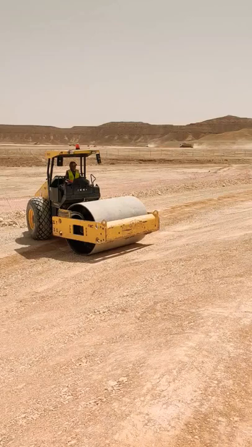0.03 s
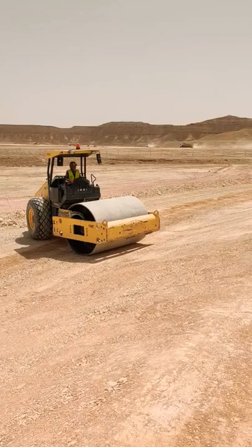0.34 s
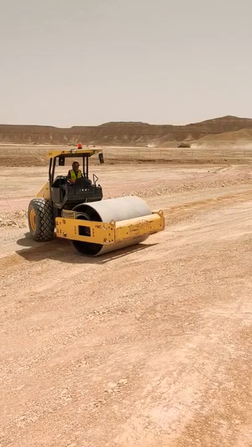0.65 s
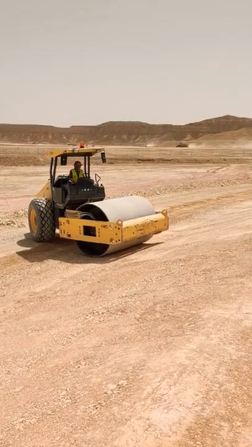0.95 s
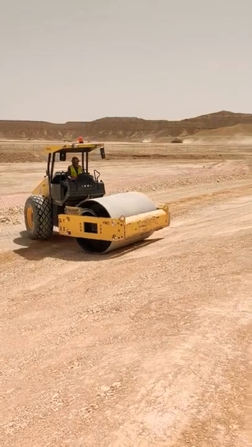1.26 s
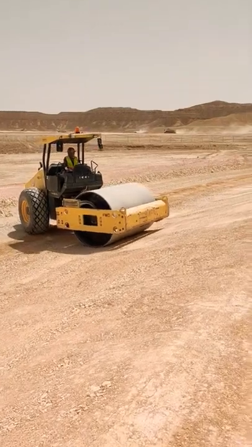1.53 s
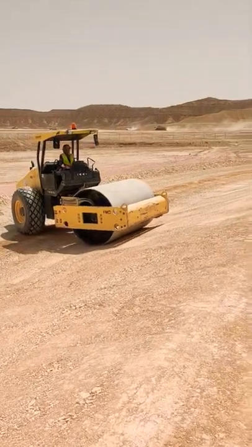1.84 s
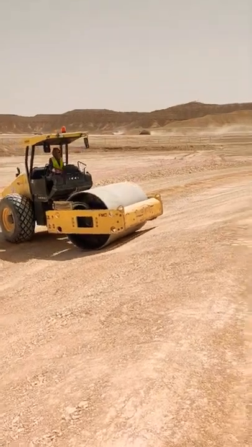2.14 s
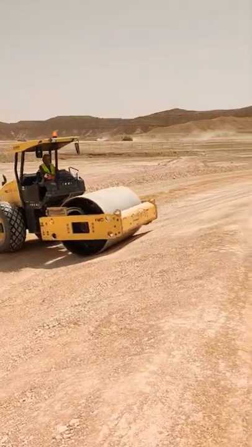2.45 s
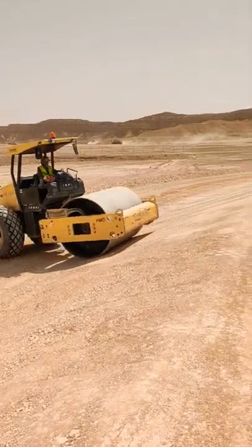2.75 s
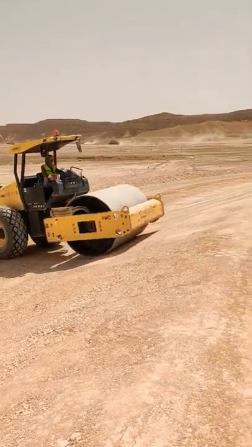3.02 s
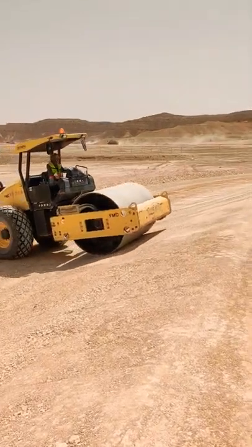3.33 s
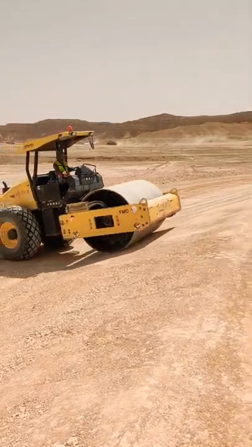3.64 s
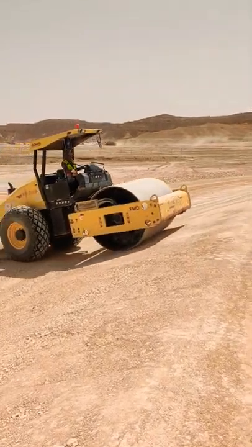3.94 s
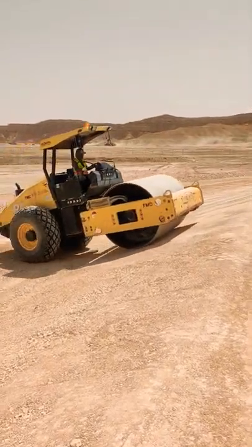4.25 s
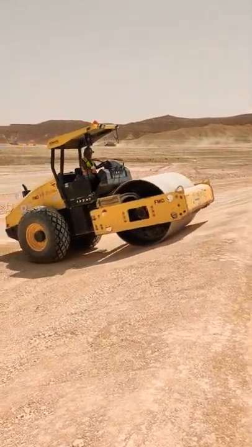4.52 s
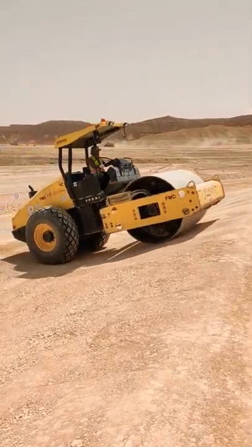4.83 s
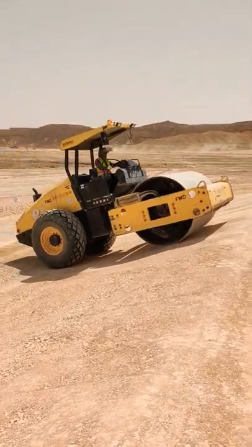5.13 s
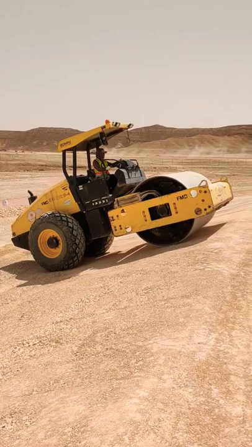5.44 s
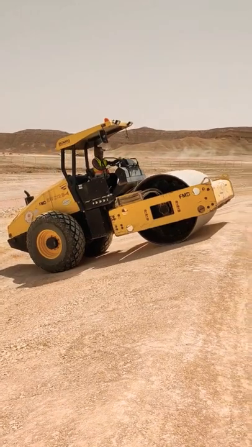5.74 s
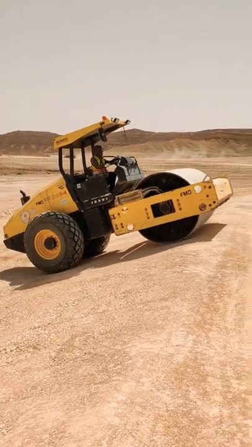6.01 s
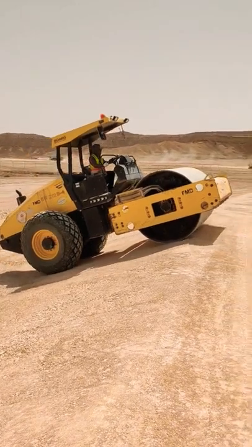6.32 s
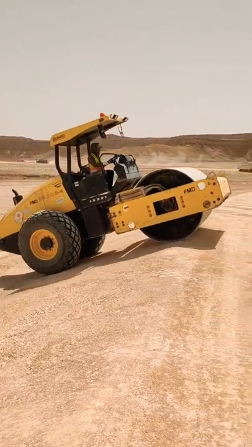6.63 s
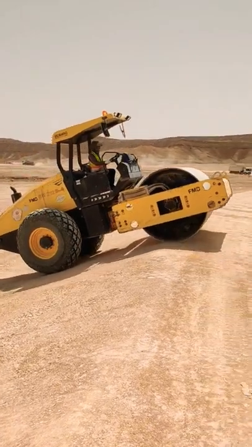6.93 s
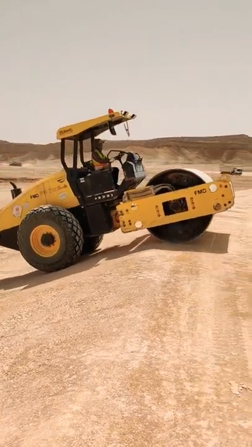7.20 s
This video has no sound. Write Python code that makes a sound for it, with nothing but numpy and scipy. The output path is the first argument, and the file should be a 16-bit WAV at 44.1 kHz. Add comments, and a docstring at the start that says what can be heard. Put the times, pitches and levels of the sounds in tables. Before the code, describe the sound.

A very brief muffled burst ends in a click, followed by a short silence. At about 0.5 seconds a road roller cuts in outdoors, its diesel engine running at steady speed with a wavering hydraulic whine above it. Stones squeak briefly under the steel drum in the first second and a half, and others break with dull clanks until about 5 seconds, the loudest near 2.4. Around 3 seconds the drum's vibration spins up, shaking the frame into a rattle, then building into a deep, fast pounding. From about 5.5 seconds the drum bounces and the throb becomes rougher. The machine grows gradually louder and is closest at around 6 seconds, still running at the end, just past 7. Faint gravel hiss and gritty steel ringing accompany it. Underneath is a low ground rumble, with gusts and occasional dull wind thumps on the microphone.

```python
"""A muffled burst and a click, then a vibratory road roller is heard working loose desert ground.
One microphone in the open air; the machine creeps past it, about 5.5 m away at the closest.
Its four-cylinder diesel holds near 2200 rpm and a nine-piston hydraulic pump whines over the exhaust.
Stones squeak and break under the steel drum. The eccentric weight inside spins up, and the drum pounds
the gravel and finally bounces on every second turn. The ground rumbles; gusts buffet the microphone."""
import sys
import numpy as np
from scipy import signal
from scipy.fft import rfft, irfft, next_fast_len
from scipy.io import wavfile

SR = 44100
rng = np.random.default_rng(int(sys.argv[2]) if len(sys.argv) > 2 else 0)


def bounce(signal):
    """Save signal as a 16-bit WAV file at the path given by the first command-line argument."""
    frames = np.transpose(np.atleast_2d(signal))
    limited = np.clip(frames, -1, 1)
    pcm = np.round(limited * 32767).astype(np.int16)
    wavfile.write(sys.argv[1], SR, pcm)


N = 320607
TIME = np.arange(N) / SR

# Governed speed of the crankshaft: time_s, turns_per_s
CRANK_SPEED = [(0.55, 37.8), (1.2, 37.42), (1.8, 37.08), (2.08, 37.08), (2.33, 36.88), (2.95, 36.6),
               (3.2, 36.74), (4.2, 36.78), (5.08, 37.0), (5.33, 36.86), (5.7, 36.86), (5.95, 37.1),
               (6.2, 36.82), (6.45, 36.8), (7.2, 37.28)]
# The engine sags under load and recovers: centre_s, width_s, lost_turns_per_s
LOAD_SAGS = [(1.55, 0.11, 0.5), (3.56, 0.15, 0.9)]
# Engine tones at the closest point: crank_multiple, level_db, distance_share, waver_db
ENGINE_ORDERS = [(3, -48.5, 1.1, -0.5), (5, -53, 0.59, 4), (6, -34.5, 1.8, -0.5), (7, -34, 2.2, 3),
                 (10, -48.5, 0.96, 4), (16, -51.5, 0.44, 4.5), (21, -49, 0.3, 0.5)]
# The firing tone booms when the engine pulls: centre_s, width_s, rise_db
FIRING_BOOMS = [(1.56, 0.11, 7), (1.85, 0.15, 4), (2.7, 0.5, 5), (3.62, 0.14, 7.5), (4.58, 0.18, 10),
                (5.55, 0.33, 8.5), (6.35, 0.44, 6), (7.15, 0.2, 9)]
# The hum an octave above the firing tone swells: centre_s, width_s, rise_db
OCTAVE_SWELLS = [(4.55, 0.18, 3.5), (6.7, 0.69, 3)]
# Noise spectra of exhaust gas, engine block, valves and ground: frequency_hz, density_db
EXHAUST_SPECTRUM = [(60, -14.5), (110, -1), (160, -0.5), (230, -1.5), (320, -0.5), (375, -4), (430, -10.5),
                    (500, -17), (700, -42.5), (1200, -47.5)]
BLOCK_SPECTRUM = [(350, -15.5), (500, -7), (620, -1), (780, 3), (920, 0.5), (1060, -5), (1250, -3.5),
                  (1550, -10), (1950, -7.5), (2300, -12), (3000, -37)]
VALVE_SPECTRUM = [(1500, -26.5), (2200, 0.5), (2700, 1), (3300, -0.5), (4000, -4.5), (5500, -22)]
GROUND_SPECTRUM = [(7, -3), (25, -0.5), (45, -7), (70, -5.5), (100, -15), (140, -17.5), (250, -46.5)]

# The pump's piston tone at the microphone: time_s, level_db
PISTON_LEVEL = [(0.6, -38), (1.65, -34), (1.95, -38.5), (2.3, -38.5), (3.25, -33.5), (3.5, -49),
                (3.95, -38.5), (4.25, -28.5), (4.85, -28), (5.7, -25.5), (6.25, -32), (6.55, -37),
                (6.8, -33.5), (7.25, -44)]
# Pump overtones between surges, at the closest point: harmonic, level_db, distance_share
PUMP_HARMONICS = [(2, -44.5, 1.1), (3, -64.5, 3), (4, -53, 1.4), (6, -51.5, 1.5), (7, -57, 3.1),
                  (8, -57.5, 2.1), (9, -63.5, 1.9), (10, -67, 1.6), (11, -63.5, 2), (13, -70, 2),
                  (14, -74, 1.8)]
# Oil pressure surges and one harmonic sings out: start_s, end_s, harmonic, level_db
PRESSURE_SURGES = [(0.443, 0.65, 2, -41.5), (1.417, 1.475, 2, -32.5), (2.225, 3.07, 2, -38.5),
                   (5.227, 5.851, 2, -33), (5.885, 6.4, 2, -41), (6.467, 6.921, 2, -36),
                   (6.954, 7.17, 2, -33.5), (2.355, 2.98, 4, -50), (6.22, 7.3, 4, -48.5),
                   (1.42, 1.795, 6, -53), (2.237, 2.834, 6, -47.5), (3.34, 3.427, 6, -42.5),
                   (3.485, 3.587, 6, -43.5), (3.656, 3.78, 6, -48.5), (4.46, 5.25, 6, -50.5),
                   (5.282, 5.737, 6, -41.5), (6.048, 6.202, 6, -44.5), (6.207, 6.493, 6, -40.5),
                   (6.686, 6.97, 6, -45), (7.14, 7.298, 6, -48), (2.352, 3.05, 7, -58),
                   (3.502, 3.73, 7, -51), (4.25, 4.417, 7, -49), (4.72, 5.147, 7, -49),
                   (6.12, 6.45, 7, -49), (3.374, 3.6, 8, -56), (5.5, 5.85, 8, -52), (5.82, 6.0, 9, -55),
                   (6.03, 6.45, 9, -58), (6.53, 6.67, 9, -51), (6.88, 7.24, 9, -55.5)]
# Gusts and lulls of wind on the microphone: centre_s, width_s, rise_db
WIND_GUSTS = [(0.8, 0.18, 3.5), (1.1, 0.026, 2.5), (2.23, 0.069, 6.5), (3.25, 0.54, 2), (4.28, 0.065, 7),
              (6.1, 0.53, -0.5)]
# Dull thumps of wind on the microphone: centre_s, width_s, level_db
WIND_THUMPS = [(0.813, 0.004, -14), (3.019, 0.003, -15), (3.276, 0.003, -10.5), (3.61, 0.003, -11.5),
               (3.745, 0.003, -13), (4.279, 0.004, -8), (4.628, 0.003, -14)]

# Hiss of gravel ground under the drum: time_s, level_db
GRAVEL_LEVEL = [(0.5, -57), (0.85, -58.5), (1.25, -59.5), (2.1, -59), (2.95, -54), (3.9, -53.5),
                (4.65, -54.5), (5.1, -53), (5.9, -52.5), (6.45, -52), (7.25, -52)]
# Spectrum of that hiss: frequency_hz, density_db
GRAVEL_SPECTRUM = [(2500, -22.5), (3800, -2.5), (4500, 3), (5500, 2), (6500, -0.5), (7500, -6),
                   (9000, -16.5)]
# Ringing modes of the drum's steel shell: pitch_hz, relative_db
SHELL_MODES = [(1222, 13.5), (2768, 5), (3402, 1.5), (3900, -1.5), (4215, -0.5), (4387, -1), (4572, 0),
               (5001, -2), (5303, -3), (5905, -9), (6510, -10), (6788, -7.5), (7305, -5.5)]
# Grit rubs the shell in spells: centre_s, width_s, rise_db
GRIT_RUBS = [(0.9, 0.16, 8), (3.05, 0.63, 10.5), (4.6, 0.49, 12.5), (6.4, 0.19, 10)]
# Stick-slip of steel on stone: centre_s, width_s, pitch_hz, level_db, glide_hz_per_s
STONE_SQUEAKS = [(0.482, 0.01, 770, -35, 2000), (0.535, 0.012, 790, -37, 2000), (0.80, 0.025, 780, -39, 0),
                 (0.872, 0.018, 778, -31, 0), (0.81, 0.03, 1780, -51, 0), (0.98, 0.015, 1775, -46, 0),
                 (0.95, 0.02, 780, -38, 0), (1.025, 0.03, 782, -35, 0), (1.412, 0.016, 760, -30, -1300),
                 (2.415, 0.02, 778, -37, 0), (2.91, 0.05, 4387, -54, 0), (2.97, 0.04, 2767, -53, 0),
                 (3.33, 0.03, 4575, -57, 0), (3.56, 0.03, 4387, -56, 0), (4.5, 0.05, 4387, -58, 0),
                 (4.61, 0.06, 4572, -57, 0), (4.81, 0.035, 2772, -50, 0), (4.82, 0.04, 5782, -59, -300)]
# Stones breaking under the drum: start_s, decay_s, level_db, frame_pitch_ratio
STONE_BREAKS = [(0.467, 0.05, -33, 1), (1.378, 0.045, -30, 0.975), (2.378, 0.055, -24.5, 1),
                (2.52, 0.06, -32, 1), (3.09, 0.07, -34, 1), (3.24, 0.05, -34, 1), (4.02, 0.04, -33, 1),
                (4.16, 0.05, -32, 1), (4.53, 0.06, -33, 1), (4.78, 0.05, -34, 1)]
# Modes of the frame that they shake: pitch_hz, width_hz, relative_db
FRAME_MODES = [(665, 45, -11), (775, 45, -1), (942, 55, -1), (1230, 110, -2), (2030, 180, -2.5),
               (2720, 120, -12)]
# Overall colour of the frame's ring: frequency_hz, gain_db
FRAME_SPECTRUM = [(300, -5.5), (700, 8), (2000, -5.5), (4000, -13.5), (7000, -33)]

# The eccentric weight spins up: time_s, turns_per_s
WEIGHT_SPEED = [(2.2, 11.5), (2.85, 16.6), (3.25, 19.8), (4.0, 24.27), (4.5, 26.1), (5.0, 26.85),
                (5.5, 27.3), (6.0, 27.7), (6.5, 27.87), (7.27, 28.15)]
# Drum tones at full spin: weight_multiple, grounded_db, bouncing_db
POUNDING_TONES = [(1, -19, -21.5), (1.5, -44, -20.5), (2, -21, -38.5), (3, -23.5, -26), (3.5, -55, -31),
                  (4, -37, -44.5), (4.5, -55, -46.5), (5, -40, -42.5), (6, -43, -36.5)]
# Hum of the motor that drives the weight, at full spin: weight_multiple, level_db
MOTOR_HUM = [(14.5, -44), (16.5, -46.5), (27, -54)]


def from_db(db):
    """Decibels to gain."""
    return 10 ** (np.asarray(db) / 20)


def rms_one(x):
    """Scale to unit power."""
    return x / np.sqrt(np.mean(x ** 2) + 1e-20)


def curve(rows):
    """Join points of (time_s, value) with straight lines."""
    return np.interp(TIME, *np.transpose(rows))


def swell(centre_s, width_s):
    """A bell-shaped rise and fall of height 1."""
    return np.exp(-.5 * np.minimum(((TIME - centre_s) / width_s) ** 2, 100))


def swells(rows):
    """Sum the swells in a table of (centre_s, width_s, height)."""
    return sum(height * swell(centre_s, width_s) for centre_s, width_s, height in rows)


def step(at_s, edge_s):
    """A smooth rise from 0 to 1."""
    return .5 + .5 * np.tanh((TIME - at_s) / (2 * edge_s))


def drift(rate_hz):
    """A slow random wander of spread 1 that changes about rate_hz times a second."""
    hop, run_in = 40, 2000
    pole = np.exp(-2 * np.pi * rate_hz * hop / SR)
    noise = rng.standard_normal(N // hop + run_in + 2)
    slow = signal.lfilter([1], [1, -2 * pole, pole * pole], noise)[run_in:]
    return np.interp(np.arange(N) / hop, np.arange(len(slow)), rms_one(slow))


def coloured(x, spectrum):
    """Give an excitation a spectrum that falls away beyond its ends; unit power."""
    size = next_fast_len(N)
    hz, db = np.transpose(spectrum)
    bin_hz = np.maximum(np.arange(size // 2 + 1) * SR / size, 1)
    skirts = np.minimum(bin_hz / hz[0], 1) ** 2 * np.minimum(hz[-1] / bin_hz, 1) ** 2
    gain = from_db(np.interp(np.log(bin_hz), np.log(hz), db))
    return rms_one(irfft(rfft(x, size) * skirts * gain, size)[:N])


def resonance(x, hz, width_hz):
    """A two-pole resonance; unit power."""
    r = np.exp(-np.pi * width_hz / SR)
    return rms_one(signal.lfilter([1, 0, -1], [1, -2 * r * np.cos(2 * np.pi * hz / SR), r * r], x))


def tone(turns, multiple, db, waver_db):
    """One harmonic or half harmonic of a rotating part, wavering in strength."""
    angle = 2 * np.pi * (multiple * turns + rng.random())
    return np.sqrt(2) * from_db(db + waver_db * drift(5.7)) * np.sin(angle)


def pulsed_noise(cycles, fall_db):
    """Noise that slides down by fall_db through each cycle (up, if negative) and jumps back."""
    return rng.standard_normal(N) * from_db(-fall_db * (cycles % 1))


def drive_past(closest_s, closest_m, speed_m_per_s):
    """Level at the microphone in dB against the closest point, for a straight pass."""
    return -20 * np.log10(np.hypot(1, speed_m_per_s * (TIME - closest_s) / closest_m))


def at_microphone(close_db, distance_db, share, waver_db):
    """Wavering gain of a noise layer; share scales how much it loses with distance."""
    return from_db(close_db + share * distance_db + waver_db * drift(4.2))


def opening_burst(dry, start_s, click_s):
    """The sound swells in briefly, muffled and with a faint hiss, and breaks off with a 2 ms click."""
    opening = np.clip((TIME - start_s) / (click_s - start_s), 0, 1) ** .5 * (TIME < click_s)
    muffled = signal.sosfilt(signal.butter(1, 500, fs=SR, output="sos"), dry * opening)
    hiss = from_db(-55.5) * rng.standard_normal(N)
    burst = from_db(-16) * muffled + (opening > 0) * (0.22 * dry + hiss)
    snap = ((TIME >= click_s) & (TIME < click_s + 0.002)) * (rng.standard_normal(N) - 0.8)
    click = from_db(-21.5) * signal.sosfilt(signal.butter(1, 3500, fs=SR, output="sos"), snap)
    return burst + click


def diesel(turns, distance_db):
    """Two firings a turn: exhaust tones and puffs of gas, over the noise of the block and valves."""
    firings = 2 * turns
    tones = tone(firings, 1, -32 + swells(FIRING_BOOMS), waver_db=1.5)
    tones += tone(firings, 2, -28.5 + 0.84 * distance_db + swells(OCTAVE_SWELLS), waver_db=2.0)
    tones += sum(tone(turns, multiple, db + share * distance_db, waver_db)
                 for multiple, db, share, waver_db in ENGINE_ORDERS)
    # the exhaust drones loudest while its pipe faces the microphone
    drone = tone(turns, 8, -31.5 + 6 * swell(centre_s=4.04, width_s=1.43), waver_db=0.87)
    roar = at_microphone(-28, distance_db, share=0.64, waver_db=0.65)
    roar *= coloured(pulsed_noise(firings, fall_db=2.0), EXHAUST_SPECTRUM)
    block = at_microphone(-35.5, distance_db, share=0.69, waver_db=0.96)
    block *= coloured(rng.standard_normal(N), BLOCK_SPECTRUM)
    valves = at_microphone(-47, distance_db, share=0.85, waver_db=0.43)
    valves *= coloured(pulsed_noise(firings, fall_db=-0.5), VALVE_SPECTRUM)
    return tones + drone + roar + block + valves


def hydraulic_pump(turns, distance_db):
    """Nine pistons pulse the oil on each turn; surges of pressure make single harmonics sing out."""
    strokes = 9 * turns + 0.0048 * drift(16)
    whine = tone(strokes, 1, curve(PISTON_LEVEL), waver_db=0.5)
    for harmonic, db, share in PUMP_HARMONICS:
        surge = sum(from_db(surge_db) * (step(start_s, edge_s=0.025) - step(end_s, edge_s=0.025))
                    for start_s, end_s, singing, surge_db in PRESSURE_SURGES if singing == harmonic)
        resting = from_db(db + share * distance_db + 2.0 * drift(3.5))
        flutter_db = 0.42 * harmonic * drift(40)
        whine += np.hypot(resting, surge) * tone(strokes, harmonic, flutter_db, waver_db=-0.5)
    return whine


def ground_and_wind(distance_db):
    """The ground rumbles under the machine, and the rumble swells as gusts buffet the microphone."""
    gain = at_microphone(-24.5, distance_db, share=0.15, waver_db=1.0) * from_db(swells(WIND_GUSTS))
    return gain * coloured(rng.standard_normal(N), GROUND_SPECTRUM)


def gravel_hiss(weight_turns):
    """Gravel cracks in countless tiny grains, slightly louder at each turn of the weight."""
    grains = pulsed_noise(weight_turns, fall_db=0.5)
    grains *= from_db(3.1 * np.minimum(rng.exponential(1, N), 6))
    return from_db(curve(GRAVEL_LEVEL) + 0.9 * drift(3.7)) * coloured(grains, GRAVEL_SPECTRUM)


def rubbed_shell():
    """Grit rubs the drum's shell in spells over a faint steady ring, now one mode, now another."""
    ring = sum(from_db(db + 2.5 * drift(2.8)) * resonance(rng.standard_normal(N), hz, width_hz=24)
               for hz, db in SHELL_MODES)
    return from_db(-56.5 + swells(GRIT_RUBS)) * rms_one(ring)


def breaking_stones(attack_s=0.007):
    """A stone gives way and its pieces settle: a dying run of cracks thuds and clanks in the frame."""
    cracks_per_s = 7000
    cracks = rng.standard_normal(N) * (rng.random(N) < cracks_per_s / SR)
    thud = from_db(-6.5) * resonance(resonance(cracks, hz=378, width_hz=110), hz=370, width_hz=100)
    clanks = {}
    for ratio in {row[3] for row in STONE_BREAKS}:
        ring = sum(from_db(db) * resonance(cracks, hz * ratio, width) for hz, width, db in FRAME_MODES)
        clanks[ratio] = coloured(ring, FRAME_SPECTRUM)
    out = np.zeros(N)
    for start_s, decay_s, db, ratio in STONE_BREAKS:
        age_s = TIME - start_s
        envelope = np.clip(age_s / attack_s, 0, 1) * np.exp(-np.abs(age_s) / decay_s)
        out += from_db(db) * envelope * (clanks[ratio] + thud)
    return out


def squeaking_stones():
    """Steel sticks and slips unevenly on the larger stones, in short groans and squeaks."""
    slip_cycles = 0.059 * drift(30)
    out = np.zeros(N)
    for centre_s, width_s, hz, db, glide_hz_per_s in STONE_SQUEAKS:
        cycles = hz * TIME + .5 * glide_hz_per_s * (TIME - centre_s) ** 2 + slip_cycles
        out += np.sqrt(2) * from_db(db) * swell(centre_s, width_s) * np.sin(2 * np.pi * cycles)
    return out


def wind_thumps():
    """Wind buffets the microphone with single dull, low thumps."""
    return sum(from_db(db) * swell(centre_s, width_s) for centre_s, width_s, db in WIND_THUMPS)


def shaken_frame(spin_hz, turns, resonance_hz=20.8, width_hz=5.4):
    """Near its resonance the frame shudders and rattles once for each turn of the weight."""
    shaking = np.exp(-.5 * ((spin_hz - resonance_hz) / width_hz) ** 2)
    shudder = from_db(-28) * coloured(pulsed_noise(turns, fall_db=11.5), EXHAUST_SPECTRUM)
    rattle = from_db(-41.5) * coloured(pulsed_noise(turns, fall_db=3.0), BLOCK_SPECTRUM)
    return shaking * (shudder + rattle)


def pounding_drum(spin_hz, turns, full_spin_hz=32):
    """The weight pounds harder as it gains speed; once the drum bounces, half multiples stand out."""
    force = step(at_s=2.79, edge_s=0.065) * (spin_hz / full_spin_hz) ** 0.7
    bouncing = step(at_s=5.46, edge_s=0.031)
    lowest_hz = 21  # slower beats hardly carry through the air
    blows = np.zeros(N)
    for multiple, grounded_db, bouncing_db in POUNDING_TONES:
        db = grounded_db + (bouncing_db - grounded_db) * bouncing
        bass_loss = np.hypot(1, (lowest_hz / (multiple * spin_hz)) ** 4)
        blows += tone(turns, multiple, db, waver_db=2.3) / bass_loss
    # the motor that drives the weight hums faintly as it nears full speed
    motor = sum(tone(turns, multiple, db, waver_db=1.5) for multiple, db in MOTOR_HUM)
    return force * (blows + swell(centre_s=6.0, width_s=1.4) * motor)


def scene():
    """Engine, pump and drum pass one fixed microphone in the open air, over a low rumble."""
    crank_turns = np.cumsum(curve(CRANK_SPEED) - swells(LOAD_SAGS)) / SR
    spin_hz = curve(WEIGHT_SPEED)
    weight_turns = np.cumsum(spin_hz) / SR
    distance_db = drive_past(closest_s=6.14, closest_m=5.47, speed_m_per_s=1.37)
    mix = diesel(crank_turns, distance_db) + hydraulic_pump(crank_turns, distance_db)
    mix += ground_and_wind(distance_db) + gravel_hiss(weight_turns) + rubbed_shell()
    mix += breaking_stones() + squeaking_stones() + wind_thumps()
    mix += shaken_frame(spin_hz, weight_turns) + pounding_drum(spin_hz, weight_turns)
    return mix[None]


def record(dry):
    """After the burst and a short silence the sound cuts in and stays; the top treble is cut off."""
    on_s, fade_s, cutoff_hz = 0.4645, 0.001, 7780
    burst = opening_burst(dry, start_s=0.121, click_s=0.160)
    sustained = dry * np.clip((TIME - on_s) / fade_s, 0, 1)
    top_cut = signal.ellip(6, .3, 36, cutoff_hz, fs=SR, output="sos")
    return signal.sosfilt(top_cut, burst + sustained)


dry = scene()
out = record(dry)
bounce(out)
```